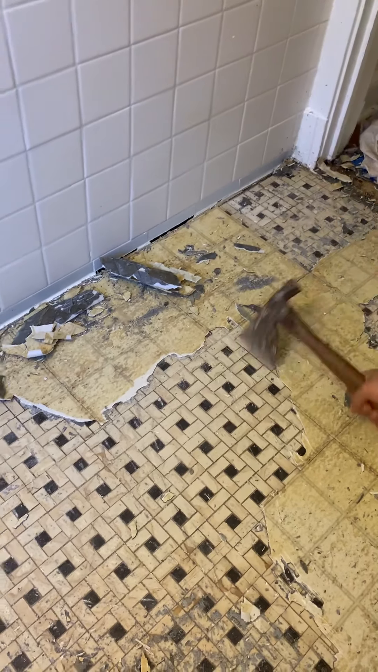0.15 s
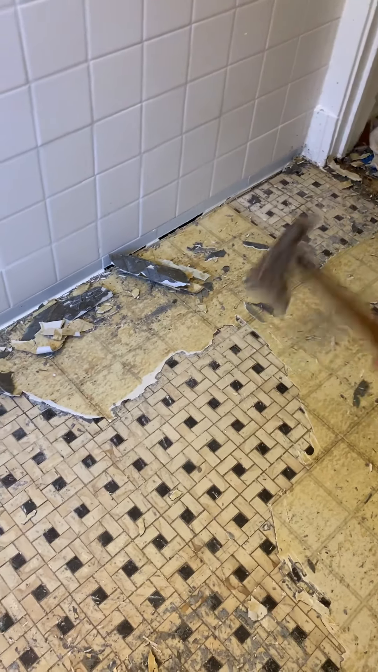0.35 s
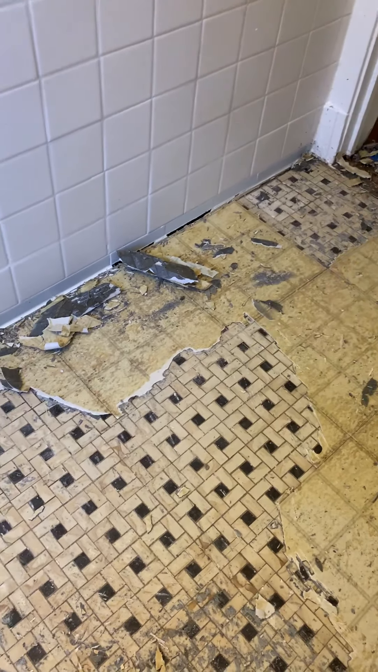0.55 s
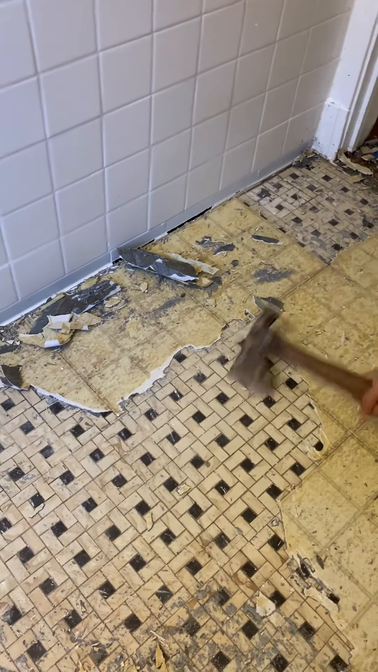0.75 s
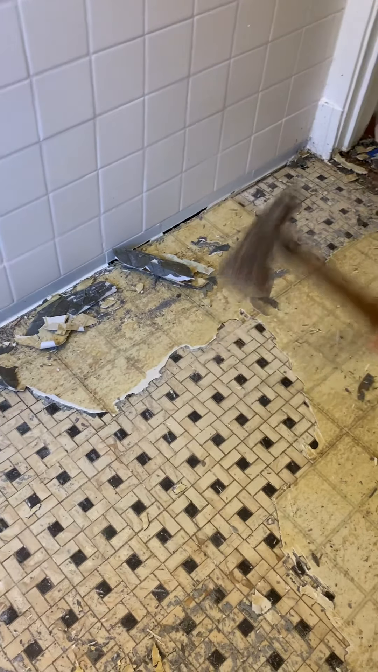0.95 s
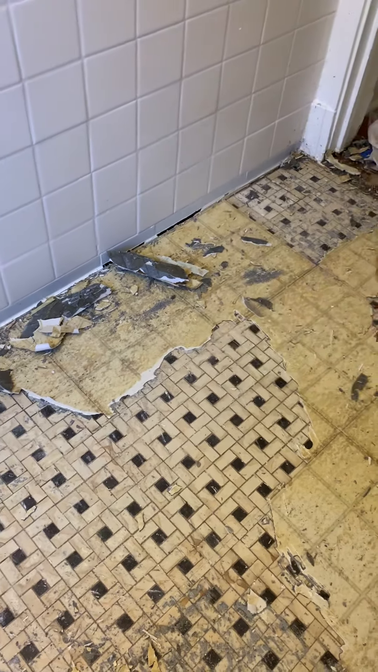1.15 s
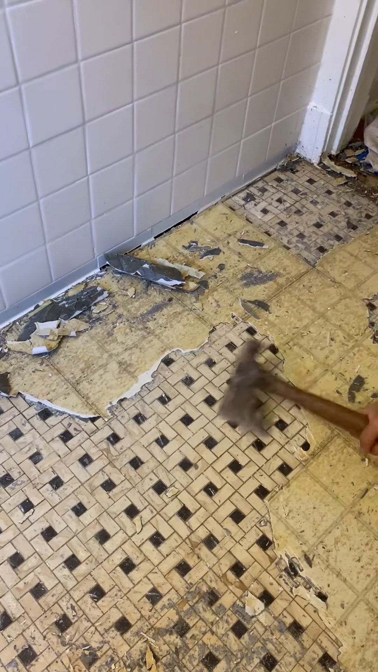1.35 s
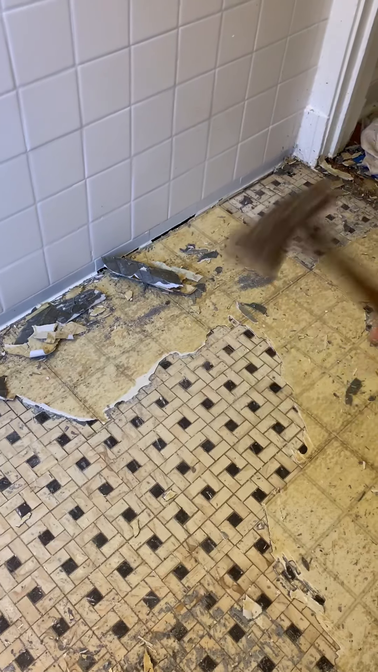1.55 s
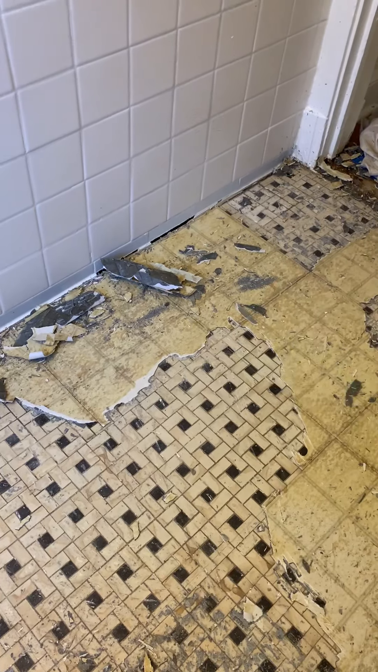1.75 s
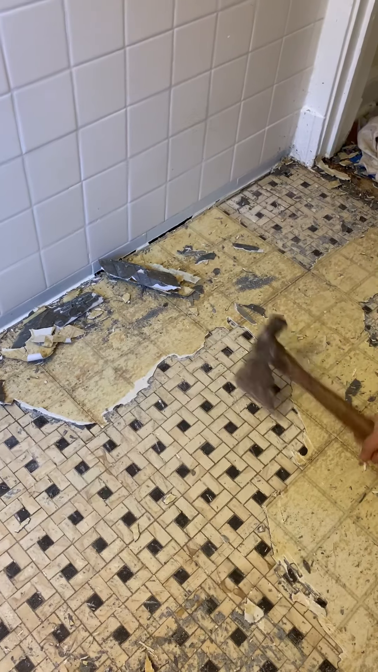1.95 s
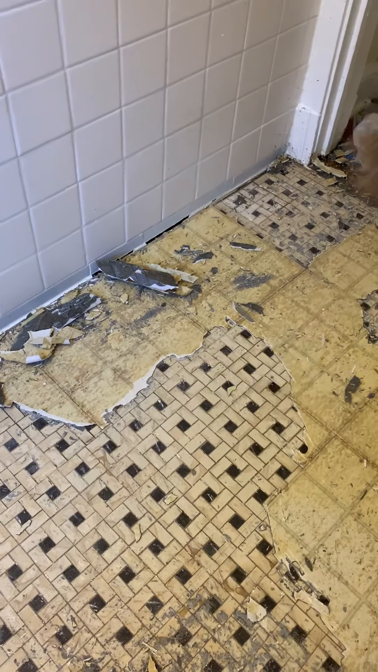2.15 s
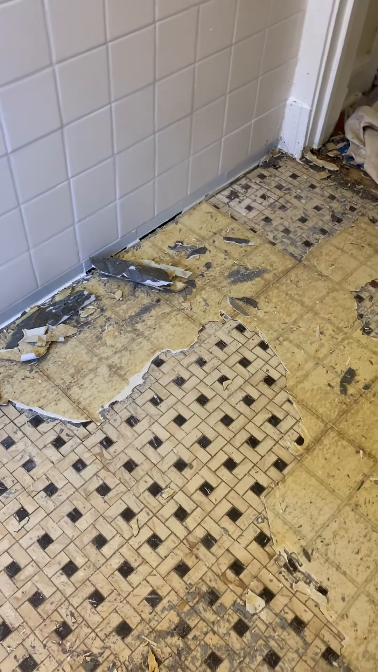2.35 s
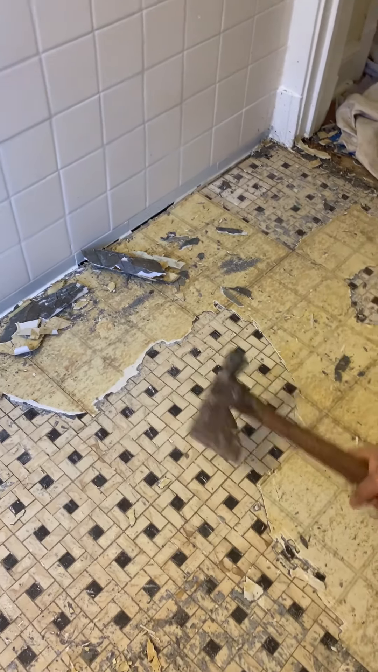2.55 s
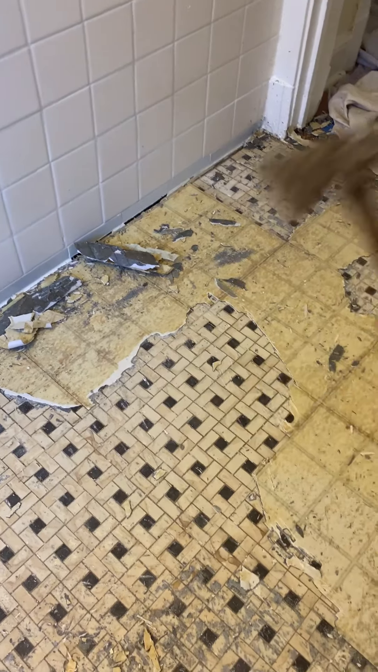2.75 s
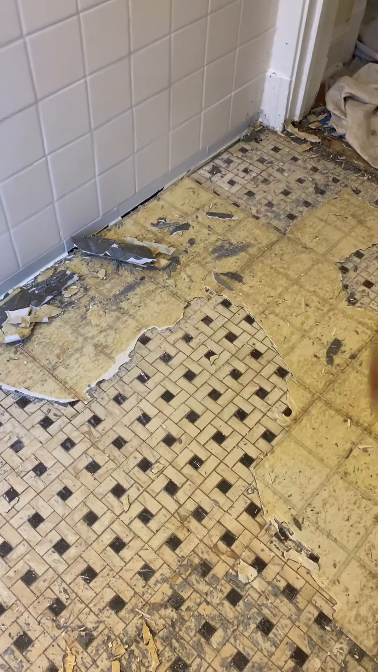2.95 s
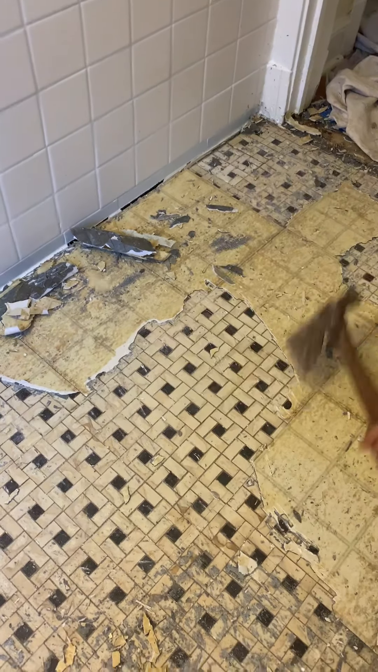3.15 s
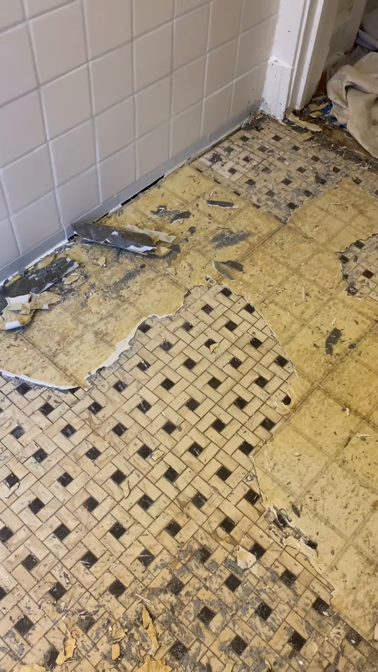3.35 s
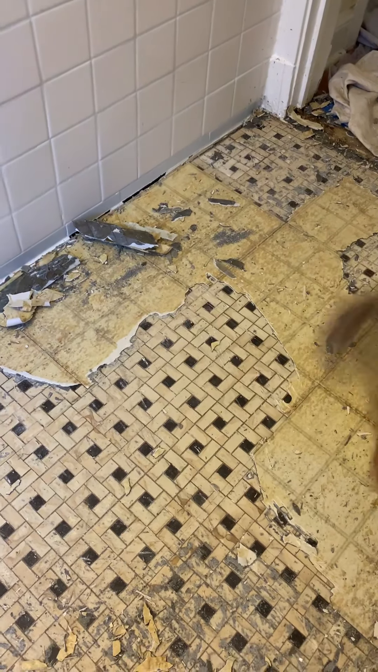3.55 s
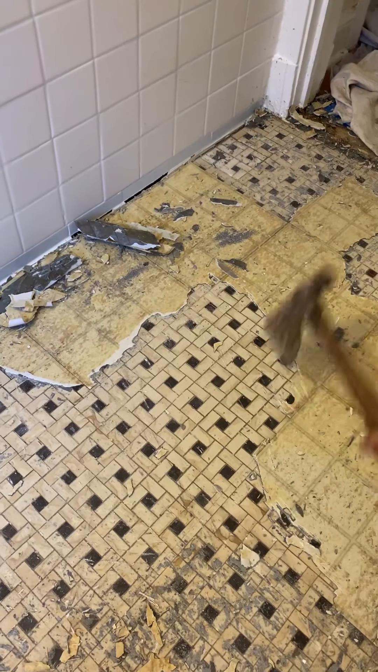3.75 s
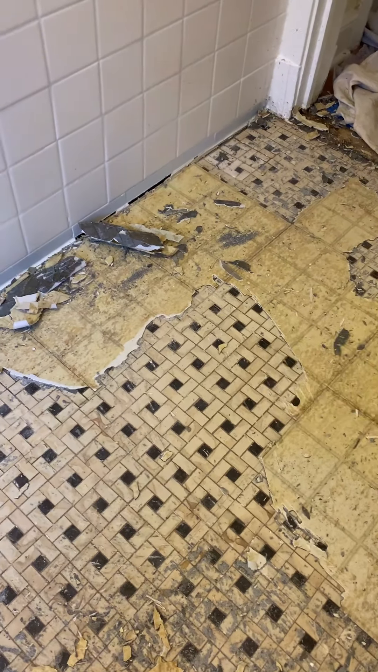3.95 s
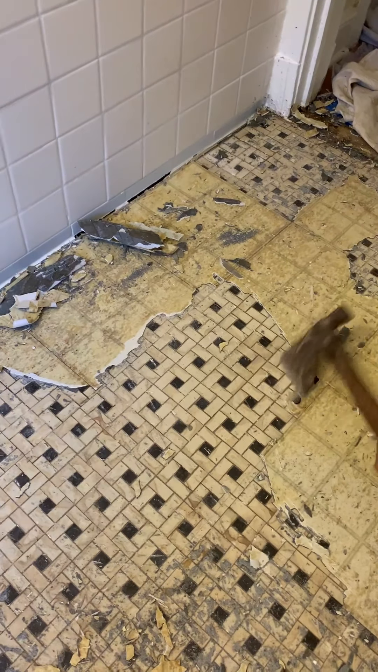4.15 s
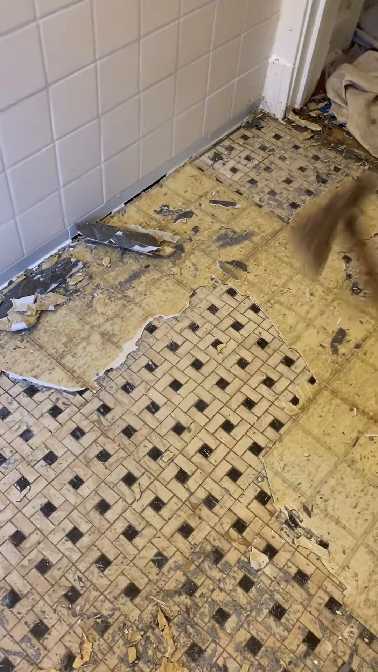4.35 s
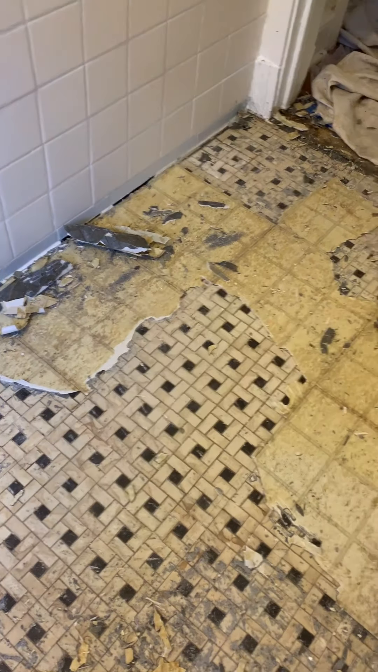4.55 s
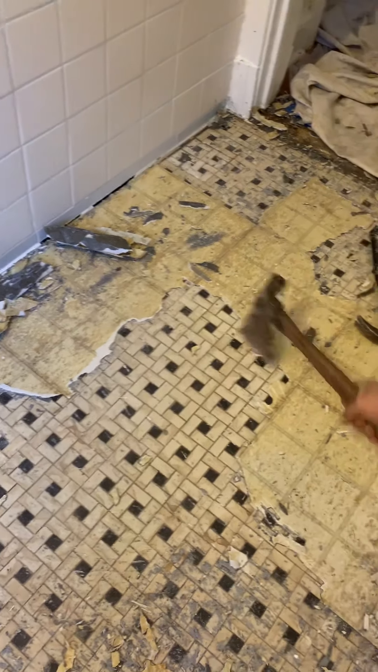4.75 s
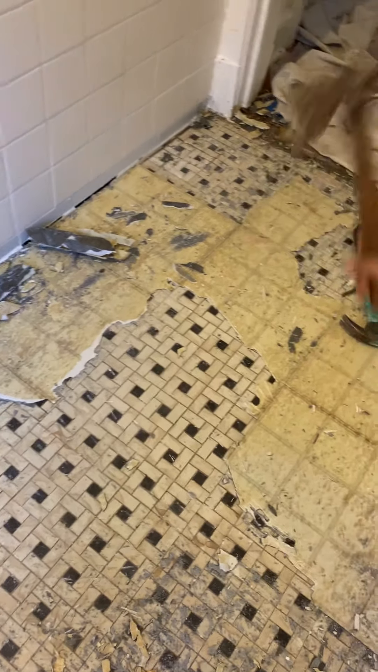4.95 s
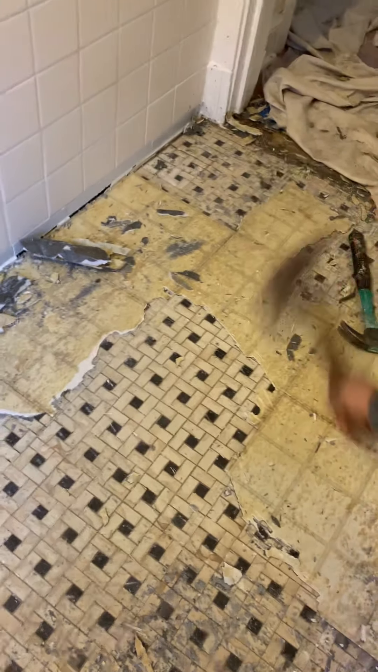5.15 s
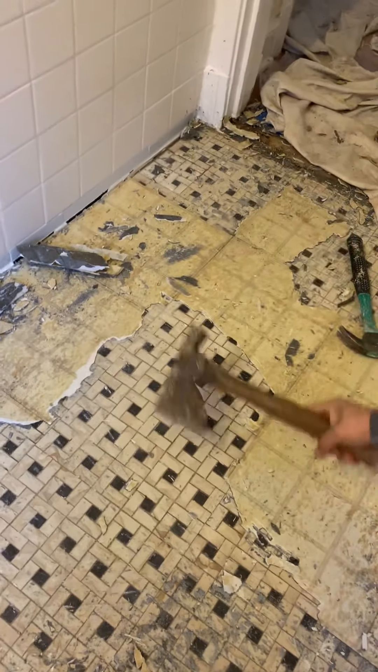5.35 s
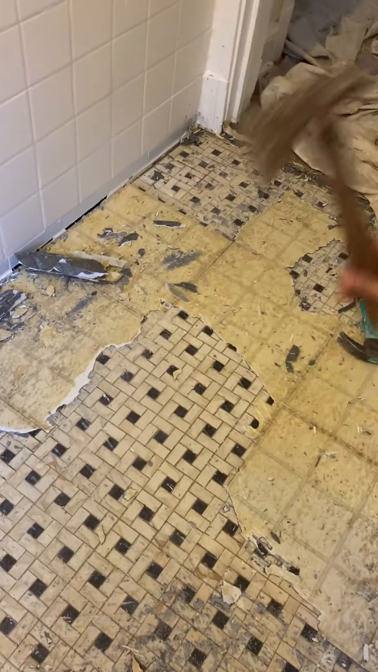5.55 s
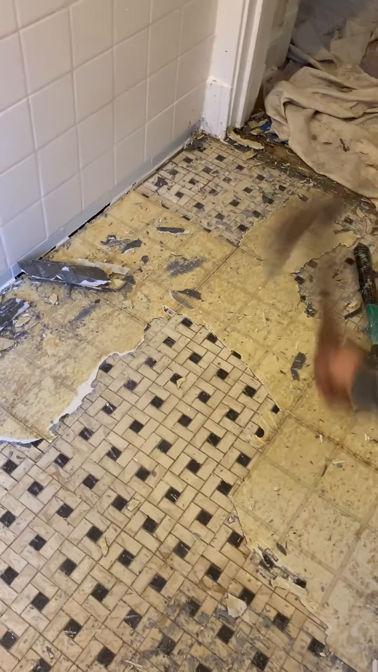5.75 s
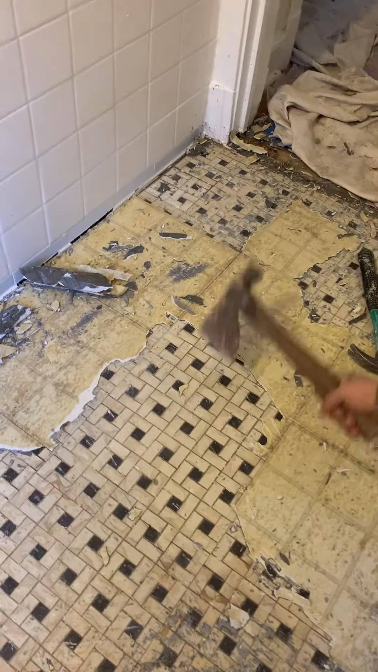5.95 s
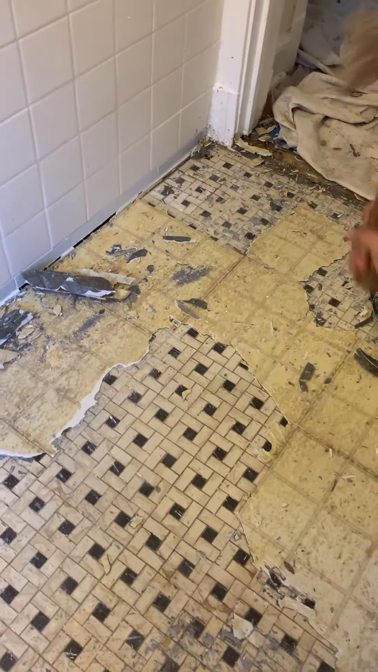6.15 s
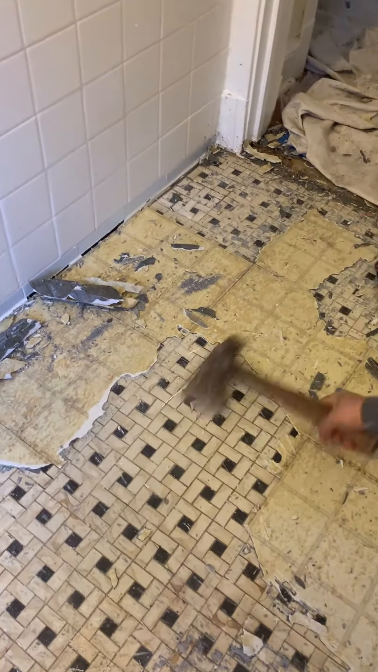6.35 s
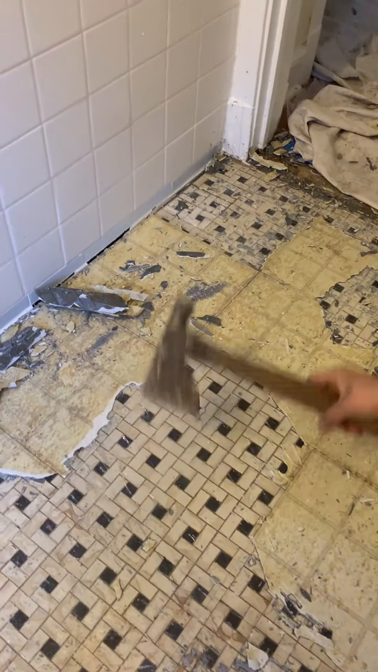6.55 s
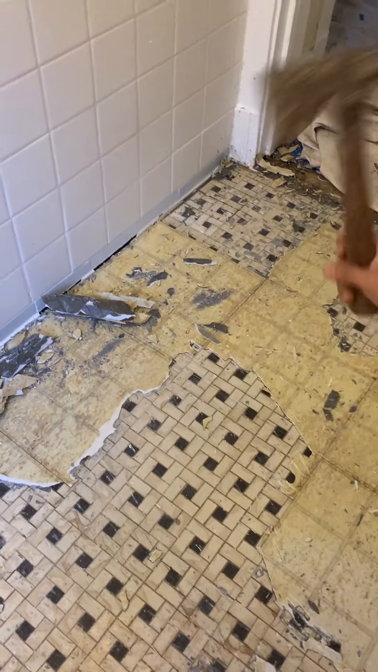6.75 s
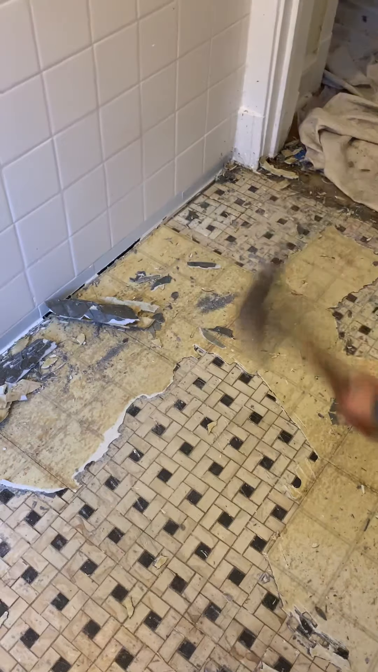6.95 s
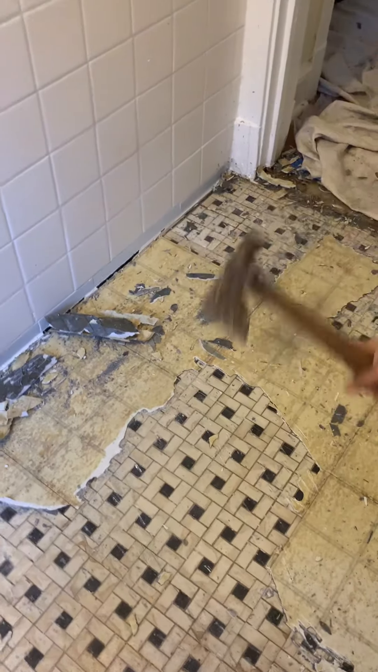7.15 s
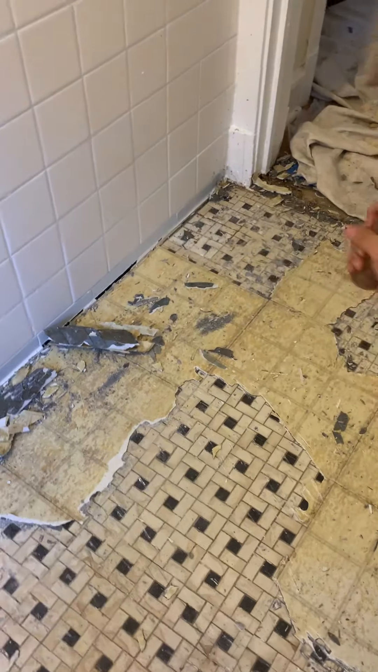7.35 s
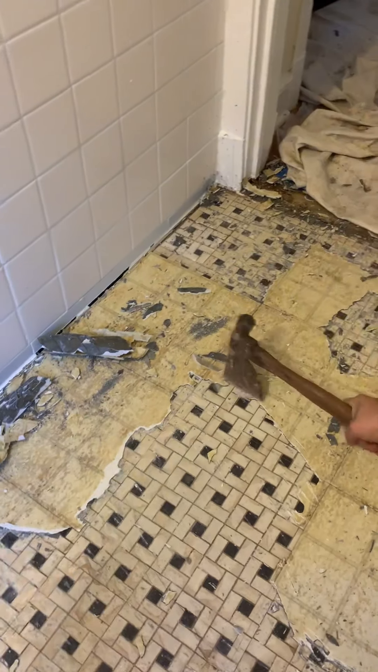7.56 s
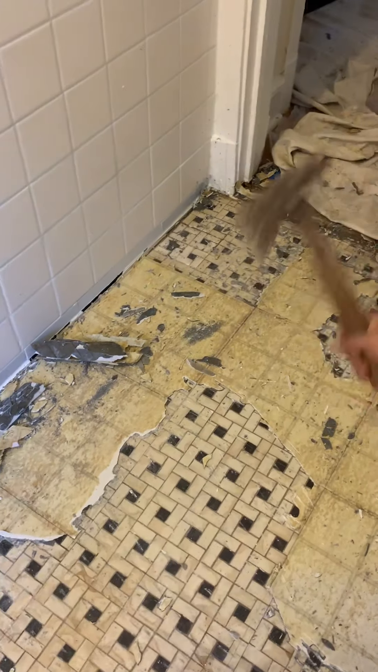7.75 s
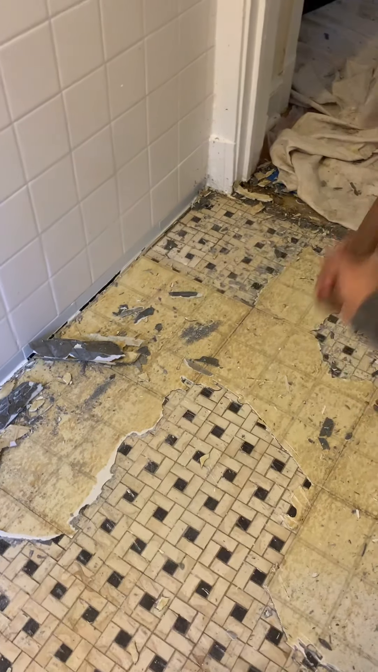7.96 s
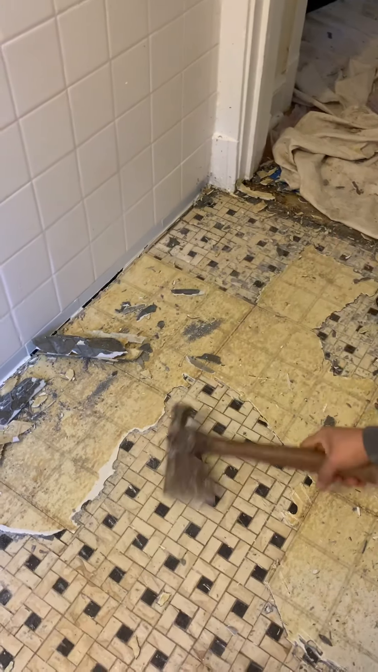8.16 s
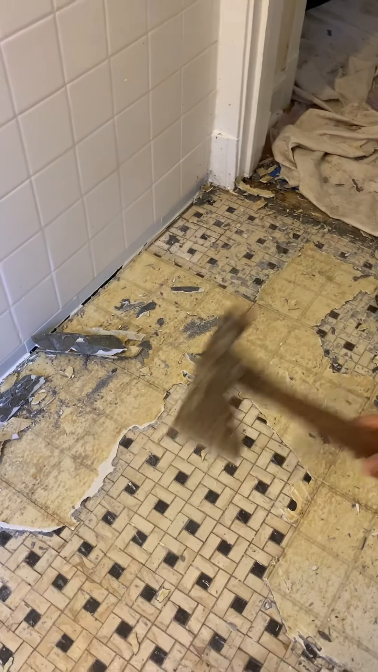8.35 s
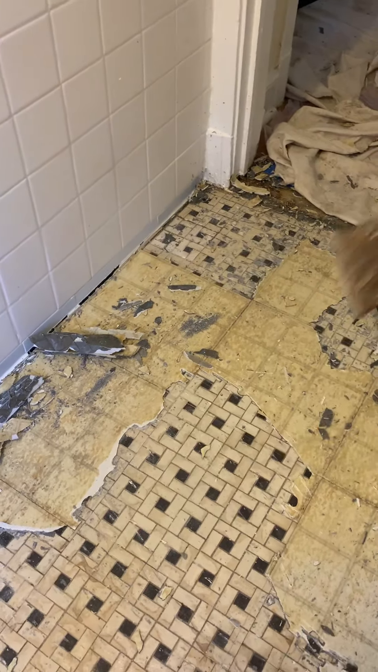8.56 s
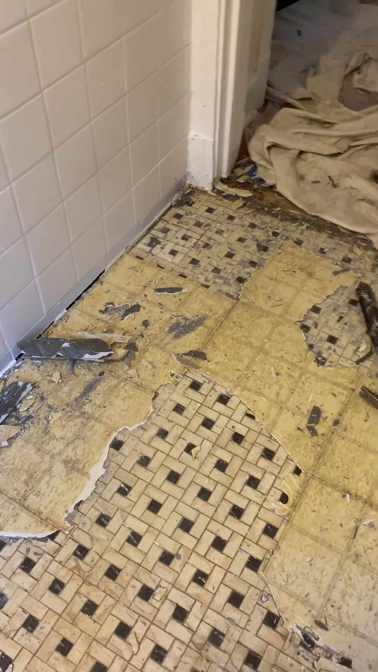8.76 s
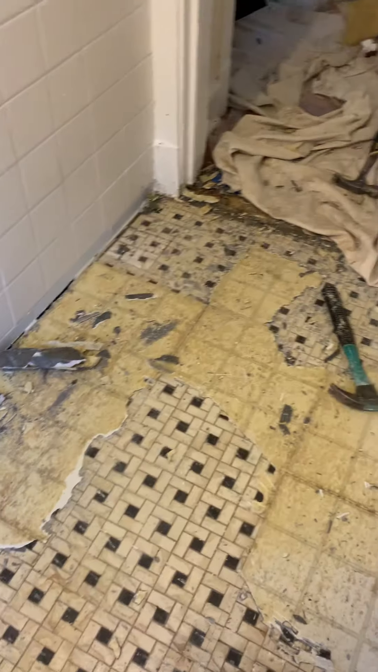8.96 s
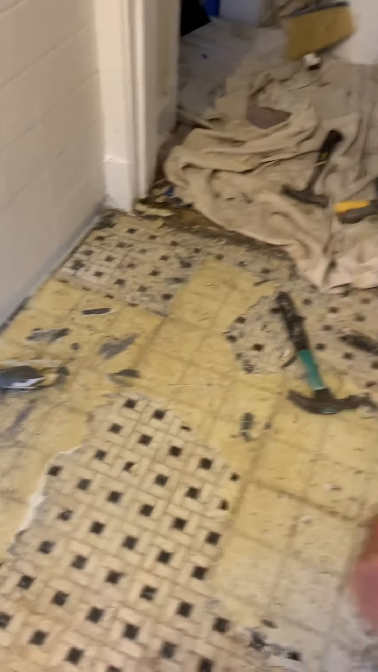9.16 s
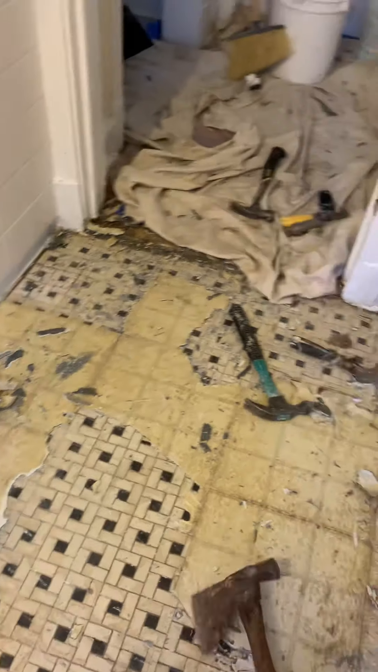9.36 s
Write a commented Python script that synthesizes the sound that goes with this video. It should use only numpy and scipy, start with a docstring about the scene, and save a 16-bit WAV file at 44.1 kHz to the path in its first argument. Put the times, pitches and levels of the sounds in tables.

```python
"""Hatchet on old floor tile

A hatchet chops old floor tile in a small, hard-walled room, heard a metre or two away on two microphone ports.
Each blow is a crack with dense reflections (shaped noise bands), a knock (a dispersed bending wave), rings of
slab and steel (narrow noise) and a boom of standing waves (resonators). Chips and crumbs land as small cracks;
near the end a grip creaks (rubbed resonators). A faint uneven hush lies underneath."""
import sys
import numpy as np
from scipy import signal
from scipy.fft import rfft, irfft, next_fast_len
from scipy.io import wavfile

SR = 44100
rng = np.random.default_rng(int(sys.argv[2]) if len(sys.argv) > 2 else 0)


def store_wav(level_fs):
    """Save 16-bit WAV to argv[1]."""
    pcm = np.round(np.clip(np.atleast_2d(level_fs), -1, 1) * 32767)
    wavfile.write(sys.argv[1], SR, pcm.T.astype(np.int16))


N = 414099
LEAD, STEP = int(.6 * SR), 8  # samples computed ahead of 0 s; samples per step of the coarse grid
SIZE = STEP * next_fast_len((N + LEAD) // STEP + 1)
HZ = np.arange(SIZE // 2 + 1) * SR / SIZE + 1e-3  # kept above zero for the logarithm
OCTAVES = np.log2(HZ)

# Blows of the hatchet, the first still dying away at 0 s: (time [s], crack level [dB],
# thud over a usual blow [dB], shatter over a usual blow [dB], spot on the edge [about -1 to 1],
# floor boom over the thud [dB], place on the floor [about -1 to 1], drumming of the boards [dB],
# knock level [dB], shard pitch [Hz], shard level [dB], loosened tile pitch [Hz], loosened tile level [dB])
BLOWS = [(-0.48, 0.5, 2, -6, 0, 6.5, -0.33, 1, -12, 4000, -44.5, 610, -40),
         (0.1135, -9.5, 2.5, -1.5, -1.24, -3, -0.25, -1.5, -9.5, 3789, -36.5, 1084, -28),
         (0.6557, -11, 2, -0.3, 0.27, -2, -0.01, -0.5, -11, 4005, -34.5, 2030, -29),
         (1.2307, -9, -2, 0.5, 1, 0.5, 0.087, -1.5, -17.5, 4040, -32.5, 1720, -28),
         (1.8096, -8, 1.1, -0.1, -0.22, 1.5, 0.38, -2.5, -12, 7536, -43.5, 2050, -31),
         (2.3687, -10, -5.5, 2, 1, 0.1, -0.14, 2.5, -24, 6933, -38.5, 1725, -27.5),
         (2.979, -9.5, 2.5, 1.2, 0.2, 0.5, 0.91, -2.5, -10, 5340, -38, 600, -24),
         (3.5275, -9.5, 4.5, -0.5, -0.22, -3.5, 0.65, 0, -15, 2670, -35, 987, -25.5),
         (4.0876, -8.5, -2.5, 2, -0.35, 5.5, 0.53, 0.5, -18.5, 5641, -38, 480, -27),
         (4.634, -9, 1, -2.5, 0, 4, 0.66, -1.5, -10, 4521, -40, 794, -23.5),
         (5.1621, -10.5, -3.5, 3.5, 1, 1, 0.11, -2, -19.5, 6761, -37.5, 1851, -32),
         (5.7796, -11, 4, 0.1, -0.098, -2, 0.14, -3.5, -12, 3316, -33, 622, -20.5),
         (6.3116, -11.5, -1, 1.5, -1.13, 0, 0.16, -3, -29.5, 5254, -35, 1618, -25.5),
         (6.9234, -10.5, 2.5, -6, 0.013, 4, -1.1, -3.5, -10, 4521, -39, 523, -28),
         (7.475, -8, 1.5, -4, -0.31, 4, -0.43, -3.5, -9, 1421, -32.5, 1133, -31.5),
         (8.0197, -9.5, -1, 2.5, -0.18, 4.5, -0.38, -3.5, -11.5, 3962, -36, 1720, -34.5),
         (9.2652, -10, 3.5, -0.3, 1, -2.5, 0.16, 4.5, -6.5, 3660, -33, 1198, -29)]
(BLOW_S, CRACK_DB, THUD_DB, SHATTER_DB, EDGE_SPOT, FLOOR_BOOM_DB, FLOOR_PLACE, DRUM_DB,
 KNOCK_DB, SHARD_HZ, SHARD_DB, TILE_HZ, TILE_DB) = np.transpose(BLOWS)
# Spectrum of a usual blow:
# (frequency [Hz], level [dB], share that follows the shatter rather than the thud [0-1])
REGIONS = [(110, -23, 0.068), (304, -20, 0.061), (940, -21, 0.033), (3540, -15, 0.77), (6360, -16, 0.81),
           (11100, -23.5, 0.93)]
# Answer of the room: (frequency [Hz], colour [dB], t60 [s], build-up [ms], crack colour [dB])
ROOM = [(46.7, -24.5, 0.97, 18, -32.5), (104, -7.5, 0.37, 4, -18.5), (270, -10, 0.91, 4.4, -20),
        (556, -9, 0.68, 5, -20.5), (1270, -10.5, .5, 3.5, -12.5), (2600, -15, 0.36, 6, -16),
        (5000, -9, 0.34, 1.5, -11), (8100, -12.5, 0.28, 1.1, -9.5), (9200, -7, .26, 1.1, -10),
        (10800, -8, 0.24, 1.1, -14.5), (13600, -5.5, 0.24, 1.2, -14), (15300, -27, 0.2, 1.2, -24)]
# The crack, direct and off the nearest walls: (delay [ms], level [dB])
ECHOES = [(.6, 11.5), (4.2, -5), (8.5, -16), (14, -4.5), (21, -0.5)]


def undb(db):
    """Level to amplitude: 20 dB is a factor of ten."""
    return 10 ** (np.asarray(db) / 20)


def across(hz, table, order=1):
    """Interpolate one column of a spectrum on a log-frequency axis, as hearing spaces pitch."""
    table = np.array(table)
    return np.interp(np.log(hz), np.log(table[:, 0]), table[:, order])


def strikes(s, size):
    """Impulsive excitation: an impulse at each time on the coarse grid."""
    out = np.zeros(SIZE // STEP, np.asarray(size).dtype)
    np.add.at(out, (np.asarray(s) * SR + LEAD).astype(int) // STEP, size)
    return out


def fade(x, tau_s):
    """Exponential decay: every impulse jumps up and dies away with one time constant."""
    return signal.lfilter([1], [1, -np.exp(-STEP / (max(tau_s, 1e-4) * SR))], x)


def swell(s, db, t60_s, rise_s):
    """Reverberant energy: power builds up, slowly at first, after each impulse and then decays."""
    kick = strikes(s, undb(2 * db))
    decay = fade(kick, t60_s / np.log(1e6))
    return np.maximum(decay - 2 * fade(kick, rise_s) + fade(kick, rise_s / 2), 0)


def envelope(power):
    """Amplitude is the root of power: bring it from the coarse grid to every sample."""
    return np.interp(np.arange(SIZE), STEP * np.arange(1, len(power) + 1), np.sqrt(power))


def noise(shape):
    """Random phases under a spectral shape: two unrelated noises of rms 1."""
    used = np.flatnonzero(shape > 1e-3)
    spec = np.zeros((2, len(HZ)), complex)
    spec[:, used] = shape[used] * np.exp(2j * np.pi * rng.random((2, len(used))))
    return irfft(spec, SIZE) * SIZE / np.sqrt(2 * np.sum(shape ** 2))


def wander(spacing_s):
    """Slow random modulation: normal values at even spacing, joined by lines on the coarse grid."""
    grid = np.arange(SIZE // STEP)
    knots = np.arange(0, len(grid), spacing_s * SR / STEP)
    return np.interp(grid, knots, rng.standard_normal(len(knots)))


def mode(kick, hz, t60_s, rate=SR):
    """A damped oscillator: one complex pole rings at one pitch."""
    pole = np.exp((2j * np.pi * hz - np.log(1000) / max(t60_s, 1e-3)) / rate)
    return signal.lfilter([1], [1, -pole], kick).imag


def region_db(hz):
    """Force spectrum of every blow: the bass follows its thud, the treble its shatter."""
    boom_hz, drum_hz, drum_octaves = 199, 212, 0.77  # floor boom lies mostly below; boards drum around
    share = across(hz, REGIONS, order=2)
    deep = 1 / (1 + (hz / boom_hz) ** 2)
    drum = np.exp(-(np.log2(hz / drum_hz) / drum_octaves) ** 2)
    strength_db = max(1 - share, 0) * THUD_DB + share * SHATTER_DB
    return across(hz, REGIONS) + drum * DRUM_DB + deep * FLOOR_BOOM_DB + strength_db


def crack(hz, chip_s, chip_db):
    """Brittle fracture: short bursts of power, direct and off the nearest walls, and one per chip."""
    decay_ms, rise_ms, lag_cycles = 0.78, 0.39, 1.5  # time constants of power; low bands come later
    echo_ms, echo_db = np.transpose(ECHOES)
    blow_s = (BLOW_S + echo_ms[:, None] / 1000).ravel() + lag_cycles / max(hz, 500)
    # a glancing blow cracks thinner
    solid_db = max(1 - across(hz, REGIONS, order=2), 0) * THUD_DB
    blow_db = (CRACK_DB + solid_db + across(hz, ROOM, order=4) + echo_db[:, None]).ravel()
    return swell(np.r_[blow_s, chip_s], np.r_[blow_db, chip_db],
                 decay_ms / 1000 * np.log(1e6), rise_ms / 1000)


def reflections(hz, chip_s, chip_tail_db):
    """Reverberation: dense reflections decay band by band and come in clumps."""
    patchy_db, patchy_s = 2.3, .014
    t60_s, rise_ms = (across(hz, ROOM, order=k) for k in (2, 3))
    s = np.r_[BLOW_S + ECHOES[0][0] / 1000, chip_s]
    tail_db = np.r_[region_db(hz) + across(hz, ROOM), chip_tail_db]
    return swell(s, tail_db, t60_s, rise_ms / 1000) * undb(2 * patchy_db * wander(patchy_s))


def next_room(hz):
    """Coupled rooms: the next room returns a longer, duller tail through the doorway."""
    level_db, t60_s, rise_s, dull_hz = -16.5, 0.84, .02, 2480
    power = swell(BLOW_S, region_db(hz) + across(hz, ROOM) + level_db, t60_s, rise_s)
    return power / (1 + (hz / dull_hz) ** 4)


def hush(hz):
    """Stationary noise made uneven: the quiet of the house wanders in level."""
    level_db, wander_db, wander_s = -62, 5.5, 0.09
    # Quiet of the house: (frequency [Hz], relative spectral density [dB])
    spectrum = [(24, -30), (40, -5.5), (240, -17), (380, -16.5), (900, -23), (1500, -29.5), (2600, -36),
                (4000, -32), (4900, -35.5), (7300, -39.5), (12000, -43), (15500, -61)]
    db = level_db + across(hz, spectrum) + wander_db * wander(wander_s)
    return undb(2 * db) * hz / 130  # a band's power grows with its width


def interference():
    """Comb-like interference: walls close by favour some pitches, and a few are hardly carried."""
    uneven_db, uneven_hz = 3, 40.19  # depth and spacing of the ripple
    # Pitches weakened or lifted by the room: (frequency [Hz], width [Hz], level [dB])
    dips = [(346, 40, -1), (404, 17, 1.5), (904, 180, -5), (1260, 200, -2), (3124, 500, -5.5),
            (4534, 83, -2), (5964, 550, -3)]
    knots_hz = np.arange(0, SR / 2, uneven_hz)
    ripple_db = uneven_db * np.interp(HZ, knots_hz, rng.standard_normal(len(knots_hz)))
    for hz, width_hz, db in dips:
        ripple_db = ripple_db + db / (1 + (2 * (HZ - hz) / width_hz) ** 2)
    return undb(ripple_db)


def shatter():
    """Band-wise energy: cracks, reflections, next room and hush set the power of third-octave noise."""
    chip_s, chip_level_db, dullness_db, chip_tail_db = debris()
    ripple, out = interference(), 0
    for hz in 45 * 2 ** (np.arange(26) / 3):
        dull = max(np.log2(7000 / hz), 0) ** 6.5
        chip_db = chip_level_db + across(hz, ROOM, order=4) - np.maximum(dullness_db, 0) * dull
        power = reflections(hz, chip_s, chip_db + chip_tail_db)
        power = power + crack(hz, chip_s, chip_db) + next_room(hz) + hush(hz)
        band = np.cos(np.clip(3 * (OCTAVES - np.log2(hz)), -1, 1) * np.pi / 2)
        out = out + envelope(power) * noise(band * ripple)
    return out


def debris():
    """Secondary impacts: skips, chips and random crumbs; rows of time, level, dullness, tail level."""
    grit_count, grit_s, grit_db = 14, .2, -30  # crumbs per blow, mean delay, start level re the crack
    skip_tail_db, grit_tail_db, small_dull_db = -24.5, -15.5, 8.5
    # Skips of the blade: (time [s], level [dB])
    skips = [(0.704, -3.5), (1.258, -2.5), (5.816, -8), (6.349, -3)]
    # Chips that land: (time [s], level [dB], dullness one octave below 7 kHz, none if negative [dB],
    # reflections relative to the click [dB])
    chips = [(0.7836, -26.5, 2, -8.5), (0.896, -39.5, -4, -11), (1.064, -72, 8, -16),
             (1.082, -65, 12.5, -8), (1.195, -43, -0.5, -2.5), (1.3694, -39, 8, -8),
             (1.399, -23.5, 0.5, -10.5), (1.642, -58.5, 11, -8), (1.7199, -64, 11, -6),
             (1.7592, -38.5, -3, -7.5), (2.016, -46, 18, -9), (2.192, -51, 0, -7.5),
             (2.562, -27, -0.5, -12.5), (2.5835, -29.5, -1.5, -11.5), (2.62, -28.5, 2, -12.5),
             (2.7487, -44, 0.5, -8.5), (2.828, -33.5, 0.5, -12), (3.185, -35, -2, -8.5),
             (4.2694, -48, 7, -9), (4.327, -51, 7, -8), (4.574, -43, 9, -6.5), (5.3088, -28.5, -1, -8),
             (5.3586, -31, -6, -12), (5.5533, -49.5, 17, -13), (5.596, -63, 18, -8.5),
             (5.673, -44, 18, -12), (6.0177, -32, 12, -23), (6.243, -42, 14, -9.5), (6.48, -41, -6, -7),
             (6.775, -62, 12.5, -8.5), (7.6994, -42.5, -4, -7.5), (8.213, -32, -0.5, -12),
             (8.341, -48.5, -3, -6), (8.549, -56, 3, -8), (8.841, -47.5, -3, -8)]
    late, size = rng.exponential(size=(2, len(BLOWS), grit_count))
    s = np.minimum(BLOW_S[:, None] + 0.025 + grit_s * late, N / SR).ravel()
    db = (CRACK_DB[:, None] + grit_db - 24 * late + 3 * size).ravel()  # later crumbs are weaker
    rows = [(*row, small_dull_db, skip_tail_db) for row in skips] + chips
    return np.transpose(rows + [(*row, small_dull_db, grit_tail_db) for row in zip(s, db)])


def knock():
    """Dispersion of bending waves in the floor: high pitches arrive first, a falling clack, then echoes."""
    centre_hz, spread_octaves, delay_ms, ms_per_octave, scatter_ms = 998, 1.2, 5, 2.2, .5
    # The knock and its echoes: (delay [ms], level [dB])
    echoes = [(0, -4.5), (12.3, -7.5), (16.5, -8)]
    out, hz = np.zeros(SIZE), HZ[:4096 // 2 + 1] * SIZE / 4096
    octaves = np.log2(hz / centre_hz)
    chances = rng.standard_normal((len(BLOWS), len(echoes)))
    for blow_s, knock_db, chance in zip(BLOW_S, KNOCK_DB, chances):
        at = int(blow_s * SR) + LEAD
        for (ms, db), shift in zip(echoes, chance):
            late_ms = ms + delay_ms + scatter_ms * shift - ms_per_octave * np.clip(octaves, -2, 2)
            # phase is the running sum of group delay over frequency
            phase = 2 * np.pi * np.cumsum(late_ms) / 1000 * hz[1]
            wave = irfft(np.exp(-(octaves / spread_octaves) ** 2 - 1j * phase))
            out[at:at + len(wave)] += (undb(knock_db + db) * wave / abs(wave).max())[:SIZE - at]
    return out


def ring(s, db, hz, width_hz, t60_s):
    """Resonance as narrow noise: a brief direct part, and a part that the room carries on."""
    direct_t60_s = .07
    power = swell(s, db, t60_s, 0.00032) + swell(s, db, direct_t60_s, 0.0004)
    return envelope(power) * noise(1 / (1 + (2 * (HZ - hz) / width_hz) ** 2))


def steel():
    """Modal excitation: force and striking point set how strongly slab, head, shard and tile ring."""
    scatter_db, loose_width_hz, loose_t60_s = 3, 140, .45  # full scatter from 4 kHz up; shard and tile
    # Rings of the tile slab and the hatchet: (frequency [Hz], width [Hz], level [dB], t60 [s],
    # per thud [dB/dB], per shatter [dB/dB], at edge spot 1 [dB], at floor place 1 [dB])
    resonances = [(550, 97, -29.5, 0.43, 2, -0.5, 1.5, -4.5), (762, 55, -37.5, 0.22, 1.5, -2.5, -3.5, 1.5),
                  (1117, 54, -32.5, .38, 1.5, -0.6, 3, 2.5), (1640, 450, -34, 0.57, 1.98, 2.5, -2, -5),
                  (2090, 330, -29.5, 0.44, 0.3, 1, -1, -0.1), (3360, 170, -43, 0.54, 1, 1.4, -8.5, -3),
                  (3844, 210, -37.5, 0.45, 1, 0.9, 1.2, 0.3), (4870, 140, -44, 0.42, 0, 2.5, 11.5, -1.4),
                  (5200, 150, -42.5, .3, 0, 2.1, -1.5, 0), (5800, 130, -42, 0.25, -1, -0.5, 1.5, 2),
                  (6480, 120, -41, 0.37, 0.5, 0.2, -1.5, 0.7), (7250, 160, -43, 0.29, 1.5, 2.2, 2, -0.8),
                  (7340, 150, -36.5, 0.27, 0, 0.4, 0.2, -0.2), (7800, 120, -37.5, 0.13, 1, 0.7, -0.8, -1.5),
                  (8280, 110, -44, 0.19, 0, 2.2, 0.4, 0.6), (6800, 700, -21, 0.025, -1, -0.4, 1.5, -2)]
    out = 0
    for hz, width_hz, db, t60_s, by_thud, by_shatter, by_spot_db, by_place_db in resonances:
        force_db = by_thud * THUD_DB + by_shatter * SHATTER_DB
        point_db = by_spot_db * EDGE_SPOT + by_place_db * FLOOR_PLACE
        chance_db = scatter_db * min(hz / 4000, 1) * rng.standard_normal(len(BLOWS))
        out = out + ring(BLOW_S, db + force_db + point_db + chance_db, hz, width_hz, t60_s)
    for pitches, levels in ((SHARD_HZ, SHARD_DB), (TILE_HZ, TILE_DB)):
        for s, hz, db in zip(BLOW_S, pitches, levels):
            out = out + ring([s], np.array([db]), hz, loose_width_hz, loose_t60_s)
    return out


def boom():
    """Standing waves between the walls: each place on the floor drives each mode differently."""
    scatter_db, onset_t60_s = 3.5, 0.028  # full scatter from 400 Hz up; a brief ring softens the start
    # Room modes: (frequency [Hz], level over the region [dB], t60 [s], level at floor place 1 [dB])
    room_modes = [(74, -15, 0.72, 3.5), (93, -1.5, 0.73, -1.9), (141.7, -4, 0.48, 1),
                  (171.2, -11, 0.36, 1.8), (192.3, -8, 0.72, -1), (230, -13.5, 1.4, -1.5),
                  (288.7, -18, 1.4, 1.4), (324, -15, 1, 5.5), (375.3, -10.5, 0.9, -1),
                  (398, -14.5, 0.98, -1.9), (463, -8.5, 0.28, 2.5), (548.4, -13.5, 0.66, -3),
                  (580.4, -13.5, 0.82, -1.5), (656, -9, 0.31, 2.4), (685, -13, 0.7, 1.5),
                  (753, -12, 0.6, 4.5), (777, -13.5, 0.19, 8), (823, -17, 0.19, 1.4)]
    out = 0
    for hz, db, t60_s, by_place_db in room_modes:
        level_chance, phase_chance = rng.standard_normal((2, len(BLOWS)))
        chance_db = scatter_db * min(hz / 400, 1) ** 2 * level_chance
        level_db = region_db(hz) + db + by_place_db * FLOOR_PLACE + chance_db
        kick = strikes(BLOW_S, undb(level_db) * np.exp(.8j * phase_chance))
        out = out + mode(kick, hz, t60_s, rate=SR / STEP) - mode(kick, hz, onset_t60_s, rate=SR / STEP)
    return STEP * irfft(rfft(out), SIZE)  # band-limited return to the full rate


def creaks():
    """Friction on resonators: a brief rub swells into a pitch, an overtone, a hollow body and a snap."""
    body_hz, snap_hz, snap_db = 437, 3270, -8  # the snap of a brittle edge lies under the overtone
    cycles, rub_s = 8.3, .0022  # cycles until one resonator is 60 dB down; length of the rub
    tail_db, tail_s = -18, 0.018  # the room smears each tick a little
    # Creaks of the grip: (time [s], level [dB], pitch [Hz], overtone level [dB],
    # overtone frequency [multiple of the pitch], hollow body level [dB])
    ticks = [(8.524, -47.5, 1036, -14, 1.9, -16.5), (8.73, -41, 1046, -11, 1.65, -22),
             (8.755, -52, 910, -18, 1.7, -13), (8.782, -62, 900, -14, 2.2, -7),
             (8.842, -63, 1020, -1.5, 2.2, -7), (8.884, -48, 904, -10, 1.9, -12),
             (8.899, -44, 961, -16, 1.6, -18), (8.917, -50, 211, -9, 1.5, -22),
             (8.934, -57, 189, -15, 1.5, -20), (8.946, -34.5, 965, -34, 1.9, -14),
             (8.976, -55, 950, -10, 1.4, -14), (9.001, -49, 1050, -13, 1.35, -13),
             (9.024, -40.5, 1090, 3, 1.82, -12), (9.069, -38.5, 1250, -5.5, 1.7, 3),
             (9.096, -44, 680, -10, 1.5, -14), (9.106, -45.5, 1054, -6, 1.4, -9),
             (9.135, -58, 1050, -15, 1.4, -20)]
    out = np.zeros(SIZE)
    age = np.arange(SR // 10) / SR
    for s, db, hz, upper_db, multiple, body_db in ticks:
        rough = 1 + .5 * rng.standard_normal(len(age))
        rub = rough * (age < rub_s) * np.sin(2 * np.pi * hz * age)
        rub += undb(tail_db) * rng.standard_normal(len(age)) * np.exp(-age / tail_s)
        at = int(s * SR) + LEAD
        parts = ((hz, 0), (multiple * hz, upper_db), (body_hz, body_db), (snap_hz, upper_db + snap_db))
        for part_hz, part_db in parts:
            t60_s = cycles / part_hz
            tick = mode(mode(rub, part_hz, t60_s), part_hz, t60_s)  # two in a row swell before decaying
            out[at:at + len(age)] += undb(db + part_db) * tick / abs(tick).max()
    return out


def ports(shared, apart):
    """Partial coherence: two ports mix common and separate sound, with phase and level differences."""
    # Likeness of the ports: (frequency [Hz], likeness [0-1])
    likeness = [(60, .98), (300, .9), (700, .45), (1500, .5), (3000, .2), (4200, .4), (5200, .8),
                (7000, .95), (10500, .9), (12500, .85), (15000, .85)]
    # Balance of the ports: (frequency [Hz], left minus right [dB])
    balance = [(60, -2.5), (110, 2.9), (200, -0.2), (380, 0), (700, 0), (1290, -2), (2380, -3), (4400, 0),
               (8120, -0.5), (15000, 0.5)]
    # Phase between the ports: (frequency [Hz], lead of the left [rad])
    lead = [(0, 0), (800, -.9), (1300, -.2), (2000, 0), (17600, 6 * np.pi)]
    like = np.clip(across(HZ, likeness), 0, 1)
    common = np.sqrt((1 + like) / 2) * rfft(shared)
    separate = np.sqrt((1 - like) / 2) * rfft(apart)
    turn = np.exp(.5j * np.interp(HZ, *np.transpose(lead))) * undb(across(HZ, balance) / 2)
    return irfft([(common + separate) * turn, (common - separate) / turn], SIZE)


def scene():
    """Superposition: all layers add before the two ports pick them up."""
    shared, apart = shatter() + steel()
    return ports(shared + knock() + boom() + creaks(), apart)[:, LEAD:LEAD + N]


def record(dry):
    """Band limits and saturation: the phone drops deep bass, rounds loud peaks and cuts the top."""
    bass_cut_hz, top_hz = 69.4, 15500
    high_pass = signal.butter(3, bass_cut_hz, "high", fs=SR, output="sos")
    low_pass = signal.ellip(10, .2, 80, top_hz, fs=SR, output="sos")
    rounded = np.tanh(.8 * signal.sosfilt(high_pass, dry)) / .8
    return signal.sosfilt(low_pass, rounded)


dry = scene()
out = record(dry)
store_wav(out)
```